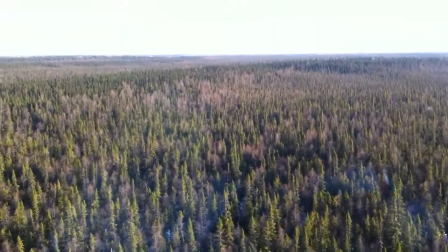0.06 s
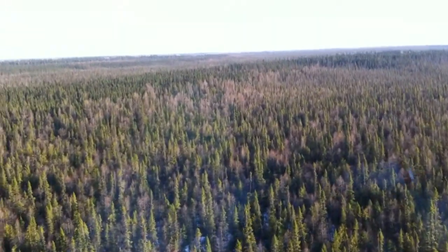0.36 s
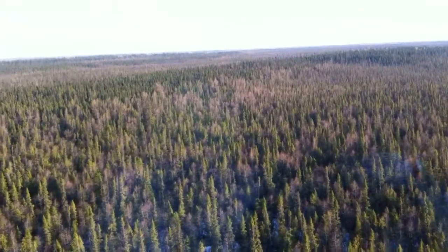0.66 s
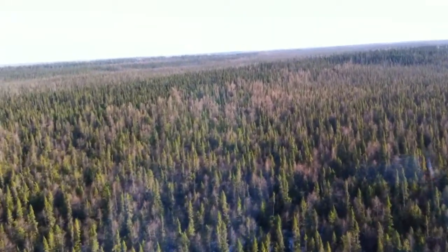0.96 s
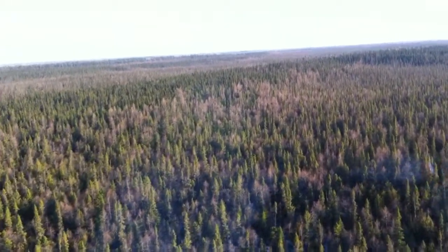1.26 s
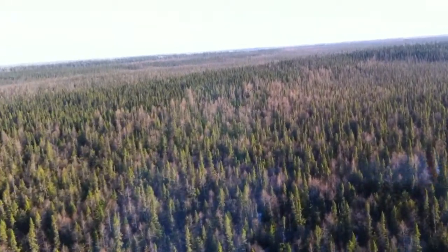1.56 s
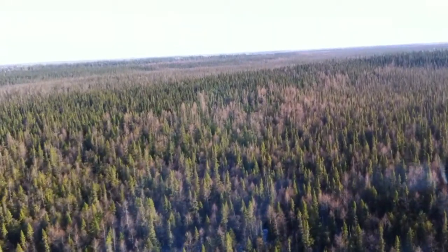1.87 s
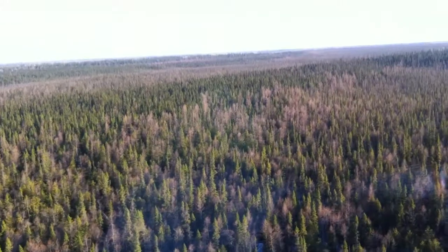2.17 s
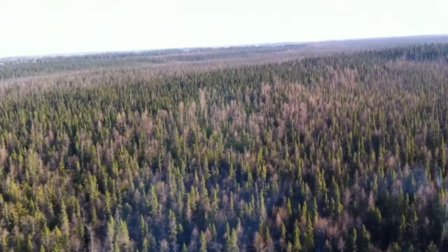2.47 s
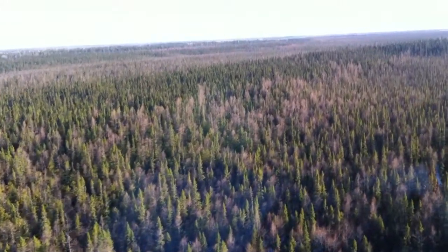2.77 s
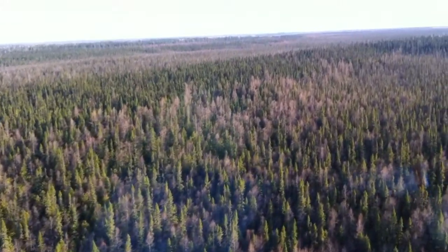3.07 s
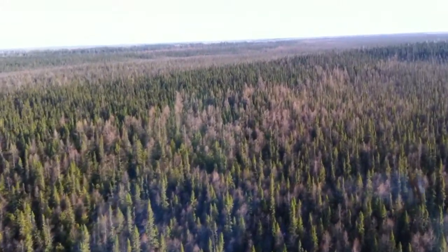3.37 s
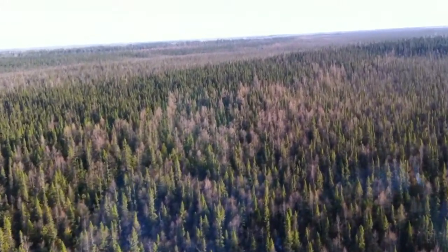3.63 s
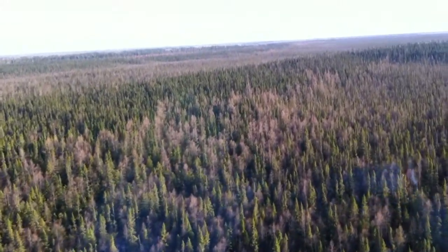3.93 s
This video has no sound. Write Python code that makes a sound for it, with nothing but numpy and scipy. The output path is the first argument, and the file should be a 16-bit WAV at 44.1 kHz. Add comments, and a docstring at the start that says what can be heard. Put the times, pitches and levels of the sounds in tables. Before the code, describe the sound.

A helicopter drones throughout the four seconds, heard inside the cabin: a low beating hum, two steady gear tones, thin high whines and rumbling air. Faint rapid puffs of hiss follow the blades. A soft, high rising chirp repeats about six times a second, growing clearer by 2 seconds. Near 3 seconds the air buffeting swells a little, and the gear tones ease slightly toward the end.

```python
"""One microphone inside a cabin, most likely a helicopter's, cruising over a forest.
From the first moment, tail rotor and drive shaft hum and beat against each other, two gear meshes whine,
and air rumbles on the hull. Each main blade pushes a puff of hiss through the door seals, and once a
turn something gives a faint rising chirp. By two seconds in, the chirp has grown clearer; near three
the buffeting swells, and the mesh tones ease off toward the end."""
import sys
import numpy as np
from scipy import signal
from scipy.fft import rfft, irfft
from scipy.io import wavfile

SR = 44100
rng = np.random.default_rng(int(sys.argv[2]) if len(sys.argv) > 2 else 0)


def store_wav(level_fs):
    """Save 16-bit WAV to argv[1]."""
    pcm = np.round(np.clip(np.atleast_2d(level_fs), -1, 1) * 32767)
    wavfile.write(sys.argv[1], SR, pcm.T.astype(np.int16))


N = 176400

ROTOR_HZ, TAIL_BLADE_HZ, SHAFT_HZ, PUMP_HZ = 6.492, 68.83, 100.94, 337.7
RING_GEAR_HZ, BEVEL_GEAR_HZ = 649.2, 1716.0
SMEAR_S_PER_HZ = .0001  # higher partials reach the cabin later, which smooths the pulses into a hum

# Speed of the whole drive train. Each row: time in seconds, percent off nominal.
DRIVE_SPEED = [(0, -0.067), (.3, -.11), (.95, -0.022), (1.5, -0.063), (2.3, 0.021), (2.9, 0.11),
               (3.2, 0.0787), (3.6, 0.089), (4, 0.055)]
# Partials of the rotating parts. Each row: multiple of the part's frequency, level in dB.
TAIL_PARTIALS = [(1, -40), (2, -21), (3, -25), (4, -30), (5, -35), (6, -33), (8, -61)]
SHAFT_PARTIALS = [(1, -28), (2, -25.5), (5, -52), (6, -61), (7, -46.5), (9, -46.5)]
PUMP_PARTIALS = [(1, -31)]
RING_WHINE = [(2, -43.5), (3, -49), (4, -44)]
BEVEL_WHINE = [(2, -44), (3, -48)]
SHAFT_OVERTONES = [(12, -49.5), (15, -51), (18, -47), (19, -53), (21, -55), (24, -53), (54, -47.5),
                   (60, -56), (63, -55)]
# Slow swell of the two mesh tones. Each row: time in seconds, gain in dB.
MESH_SWELL = [(0, 0.8), (.8, -0.5), (1.5, .6), (2.7, 0.3), (3.2, -0.8), (4, -1.5)]
# Narrow bands of gear rasp. Each row: centre in Hz, width in Hz, level in dB.
RASP_BANDS = [(1321, 46, -42.5), (1699, 35, -38), (3228, 86, -47), (3370, 72, -48.5), (5200, 61, -50)]
# Thin high whines. Each row: base frequency in Hz, multiple, points of (time in seconds, level in dB).
HIGH_WHINES = [ (RING_GEAR_HZ, 5, [(0, -38.5), (.6, -42.5), (2, -43), (4, -44)]),
               (RING_GEAR_HZ, 6, [(0, -42.5), (1.7, -46.5), (2.6, -42), (3.3, -40), (4, -43.5)]),
               (RING_GEAR_HZ, 7, [(0, -46), (.8, -52), (1.2, -45), (1.5, -47), (4, -61)]),
               (RING_GEAR_HZ, 8, [(0, -44.5), (1.5, -41), (2.5, -46), (3, -59), (4, -56)]),
               (SHAFT_HZ, 57, [(0, -38.5), (.55, -43), (.95, -39.5), (1.2, -50), (1.35, -39), (1.55, -38),
               (1.9, -44), (2.6, -40), (2.8, -49), (3.3, -38), (3.42, -52), (4, -45)])]
# Air on the hull and at the door seals. Each row: frequency in Hz, density in dB per Hz before any swell.
RUMBLE_SPECTRUM = [(20, -79), (50, -71), (85, -64), (110, -45.5), (165, -48), (205, -45), (250, -54),
                   (390, -55), (520, -60), (900, -80), (2500, -100)]
BUFFET_SPECTRUM = [(130, -73), (215, -45.5), (250, -48.5), (300, -48), (390, -52.5), (480, -60),
                   (800, -84.5)]
RUSH_SPECTRUM = [(200, -75.5), (620, -57), (780, -64), (1150, -64.5), (1450, -68), (1750, -67.5),
                 (2300, -71.5), (4600, -72.5), (5700, -71), (7500, -76), (10000, -78), (13500, -77),
                 (16000, -85)]
PUFF_SPECTRUM = [(1500, -68), (5000, -81), (9000, -75.5), (13500, -78), (16000, -80)]
# Swell of the buffeting. Each row: time in seconds, gain in dB.
BUFFET_SWELL = [(0, -1.5), (.8, -0.5), (1.4, -2), (1.8, -0.5), (2.4, -2.2), (2.9, 2), (3.6, 3), (4, 0)]
# One puff for each main blade. Each row: place in the turn from 0 to 1, width in turns, gain in dB.
BLADE_PUFFS = [(.305, 0.023, 2), (.635, .055, 1.5), (.93, 0.057, -1.5)]
# Strength of the chirp. Each row: time in seconds, level in dB at the middle of a chirp.
CHIRP_SWELL = [(0, -48), (1.2, -41), (1.8, -35), (3, -34), (3.45, -34), (3.75, -33), (4, -42)]


def from_db(db):
    """Decibels to gain."""
    return 10 ** (np.asarray(db) / 20)


def rms_one(x):
    """Scale to unit rms."""
    return x / np.sqrt(np.mean(x ** 2) + 1e-20)


def in_time(rows):
    """Join (seconds, value) points by straight lines."""
    return np.interp(np.arange(N) / SR, *np.transpose(rows))


def drift(rate_hz):
    """Slow random wander with spread 1."""
    step, settle = 40, 2000  # samples per point; points the filter needs to settle
    pole = np.exp(-2 * np.pi * step * rate_hz / SR)
    noise = rng.standard_normal(N // step + settle + 2)
    slow = signal.lfilter([1], [1, -2 * pole, pole * pole], noise)[settle:]
    return np.interp(np.arange(N) / step, np.arange(len(slow)), rms_one(slow - slow.mean()))


def air(spectrum):
    """Noise with the given density in dB per Hz."""
    hz, db = np.transpose(spectrum)
    bin_hz = np.maximum(np.arange(N // 2 + 1) * SR / N, 1)
    gain = from_db(np.interp(np.log(bin_hz), np.log(hz), db))
    return irfft(rfft(rng.standard_normal(N)) * gain, N) * np.sqrt(SR / 2)


def narrow_noise(hz, width_hz):
    """A narrow band of noise round a steady or moving centre; rms 1."""
    lowpass = signal.butter(2, width_hz / 2, fs=SR, output="sos")
    a, b = signal.sosfilt(lowpass, rng.standard_normal((2, N)))
    phase = 2 * np.pi * np.cumsum(hz * np.ones(N)) / SR
    return rms_one(a * np.cos(phase) + b * np.sin(phase))


def partials(clock, base_hz, rows, waver_db, waver_hz, throb=0):
    """Multiples of a rotation rate, each wavering on its own; throb swells them as main blades pass."""
    out = np.zeros(N)
    blade_passes = len(BLADE_PUFFS) * ROTOR_HZ * clock
    for multiple, db in rows:
        hz = multiple * base_hz
        swell = 1 + throb * np.sin(2 * np.pi * (blade_passes + rng.random()))
        level = from_db(db) * rms_one(swell * from_db(waver_db * drift(waver_hz)))
        out += level * np.sqrt(2) * np.sin(2 * np.pi * hz * (clock - SMEAR_S_PER_HZ * hz / 2))
    return out


def turns_from(clock, place):
    """Signed distance of the main rotor from a place in its turn."""
    return (ROTOR_HZ * clock - place + .5) % 1 - .5


def drive_hum(clock):
    """Tail rotor, drive shaft and a pump, heard from the cabin; close partials beat near 200 and 340 Hz."""
    parts = (TAIL_BLADE_HZ, TAIL_PARTIALS), (SHAFT_HZ, SHAFT_PARTIALS), (PUMP_HZ, PUMP_PARTIALS)
    return sum(partials(clock, hz, rows, waver_db=.4, waver_hz=2.4) for hz, rows in parts)


def gearbox(clock):
    """Meshing teeth give two firm tones that sway with the rotor, under unsteady whine and some rasp."""
    angle = 2 * np.pi * ROTOR_HZ * clock
    sway = from_db(in_time(MESH_SWELL)) * (1 + .048 * np.sin(angle) + .036 * np.sin(2 * angle))
    mesh = sum(partials(clock, hz, [(1, db)], waver_db=.42, waver_hz=17, throb=.054)
               for hz, db in ((RING_GEAR_HZ, -21.5), (BEVEL_GEAR_HZ, -23)))
    parts = (RING_GEAR_HZ, RING_WHINE), (BEVEL_GEAR_HZ, BEVEL_WHINE), (SHAFT_HZ, SHAFT_OVERTONES)
    whine = sum(partials(clock, hz, rows, waver_db=2, waver_hz=7.1, throb=.22) for hz, rows in parts)
    rasp = sum(from_db(db) * narrow_noise(hz, width) for hz, width, db in RASP_BANDS)
    return sway * mesh + whine + rasp


def high_whines(clock):
    """Thin high overtones of ring gear and shaft that come and go at the microphone."""
    out = np.zeros(N)
    for hz, multiple, levels in HIGH_WHINES:
        tone = partials(clock, hz, [(multiple, 0)], waver_db=1.7, waver_hz=17, throb=.12)
        out += from_db(in_time(levels)) * tone
    return out


def hull_air():
    """Air on the hull, just outside: a fluttering rumble, buffeting that swells late, an even rush."""
    rumble = air(RUMBLE_SPECTRUM)
    buffet = air(BUFFET_SPECTRUM) * from_db(in_time(BUFFET_SWELL))
    flutter = from_db(.8 * drift(rate_hz=25))
    rush = air(RUSH_SPECTRUM) * from_db(.43 * drift(rate_hz=2.3))
    return (rumble + buffet) * flutter + rush


def seal_puffs(clock):
    """Each main blade passing overhead pushes a puff of hiss through the door seals."""
    puffs = sum(from_db(db) * np.exp(-.5 * (turns_from(clock, place) / width) ** 2)
                for place, width, db in BLADE_PUFFS)
    return air(PUFF_SPECTRUM) * puffs * from_db(drift(rate_hz=11))


def chirp(clock, centre_hz=5780, rise_hz_per_turn=3935, width_turns=.061):
    """A short airy whistle that rises once in every turn of the main rotor."""
    turns = turns_from(clock, place=.315)
    level = from_db(in_time(CHIRP_SWELL) + drift(rate_hz=4))
    envelope = np.exp(-.5 * (turns / width_turns) ** 2)
    return level * envelope * narrow_noise(centre_hz + rise_hz_per_turn * turns, width_hz=820)


def scene():
    """The cabin in mono; all rotating parts are geared together and follow one clock."""
    clock = np.cumsum(1 + in_time(DRIVE_SPEED) / 100) / SR
    machinery = drive_hum(clock) + gearbox(clock) + high_whines(clock)
    return (machinery + hull_air() + seal_puffs(clock) + chirp(clock))[None]


def record(dry, cutoff_hz=15800):
    """The microphone's signal, with the top cut steeply."""
    return signal.sosfilt(signal.ellip(12, .1, 90, cutoff_hz, fs=SR, output="sos"), dry)


dry = scene()
out = record(dry)
store_wav(out)
```